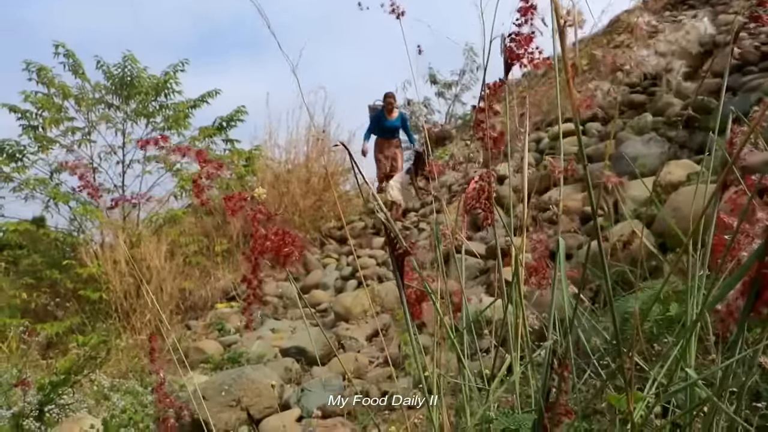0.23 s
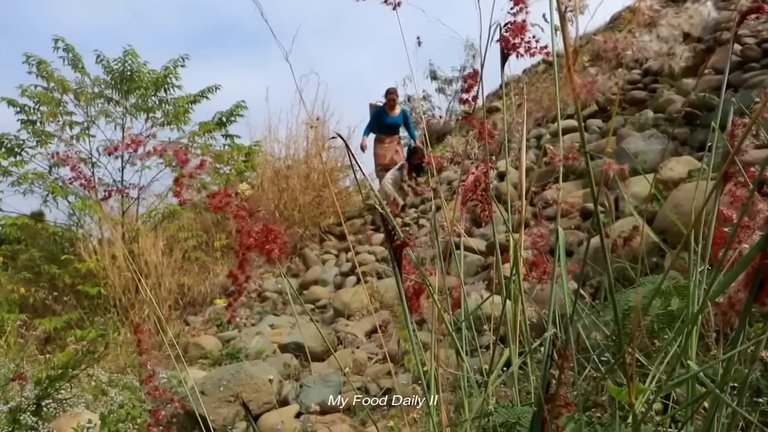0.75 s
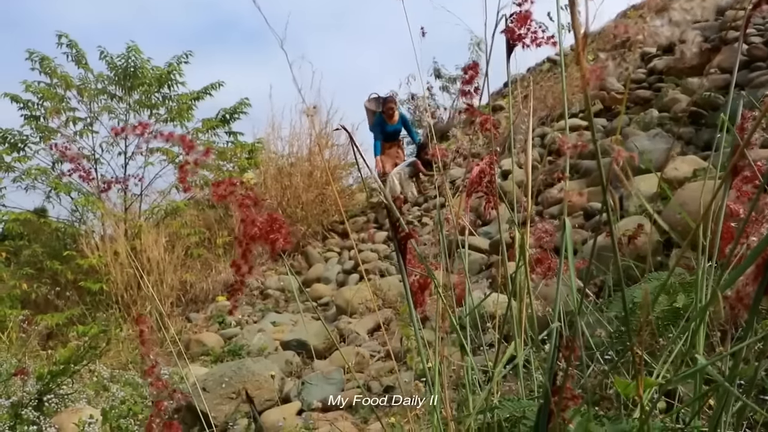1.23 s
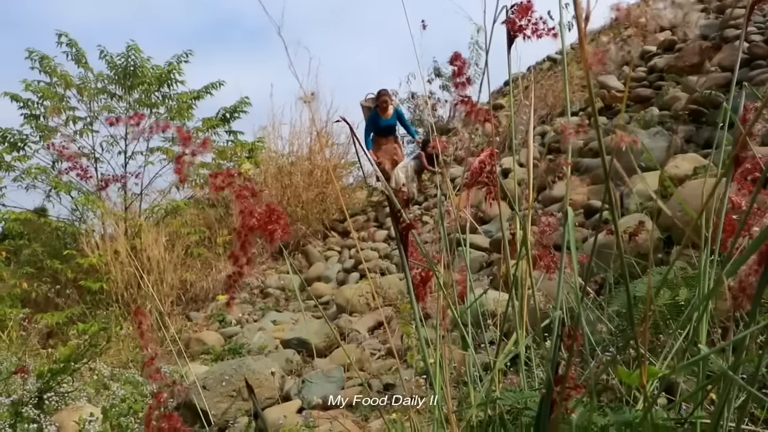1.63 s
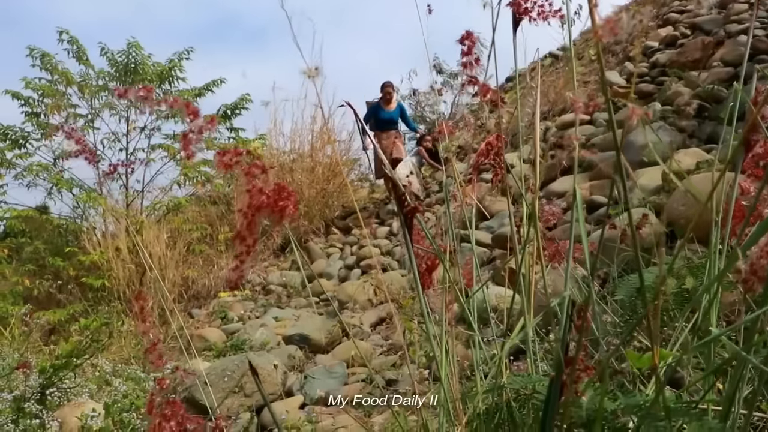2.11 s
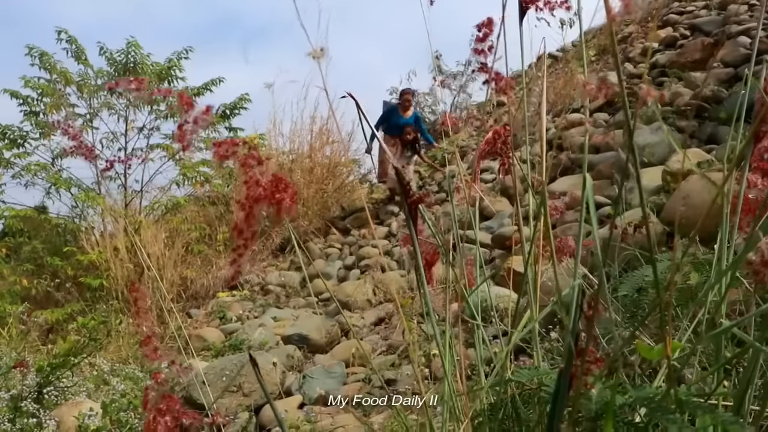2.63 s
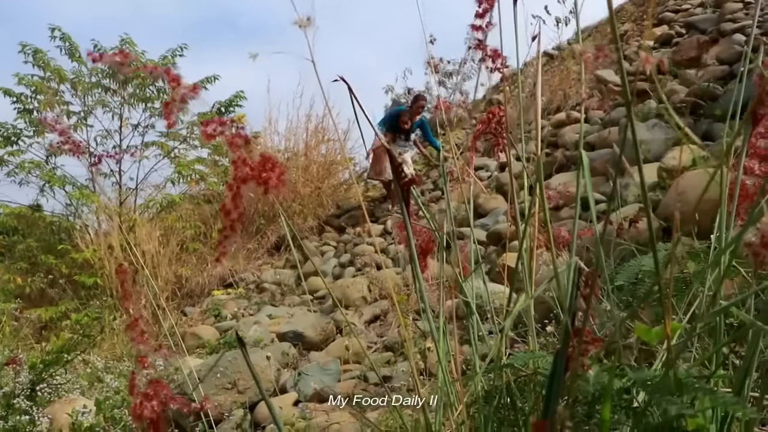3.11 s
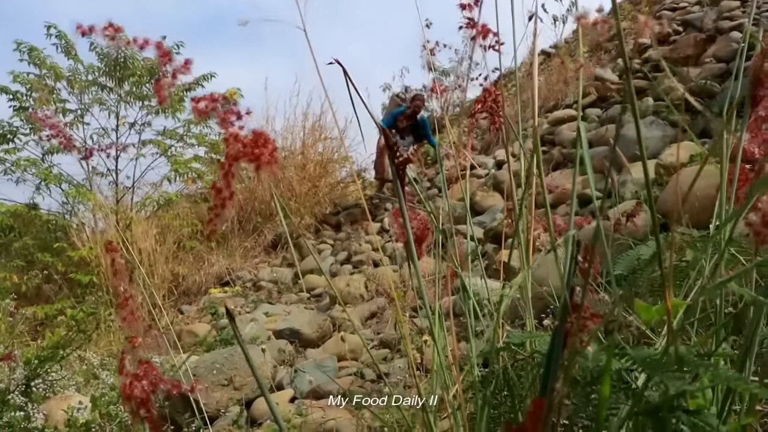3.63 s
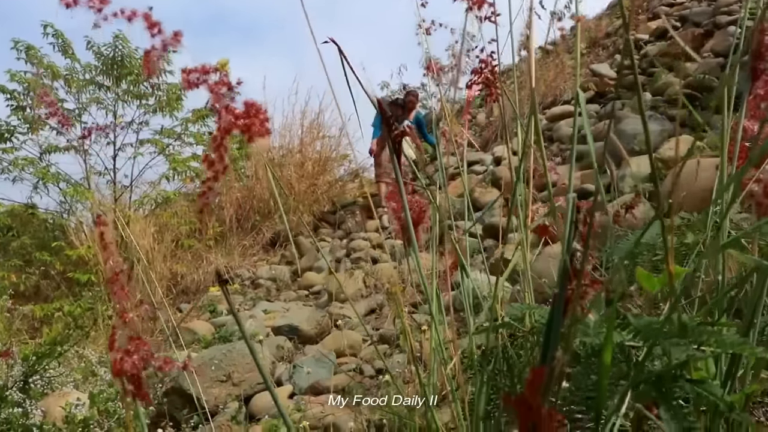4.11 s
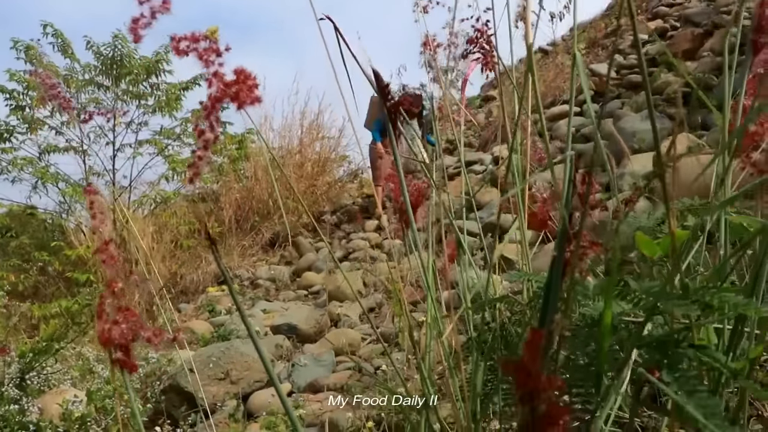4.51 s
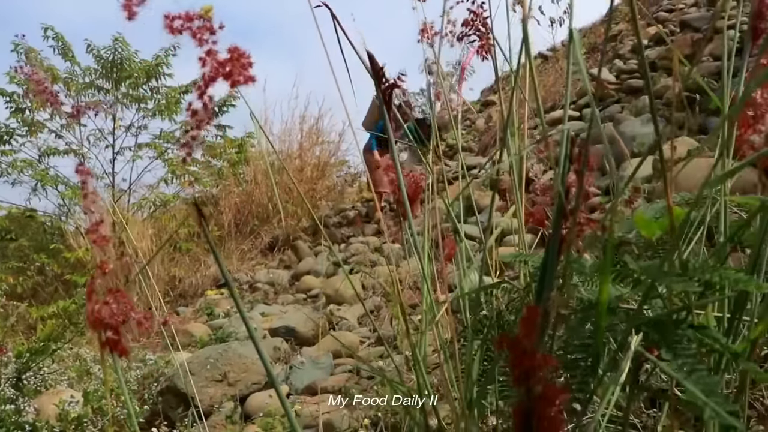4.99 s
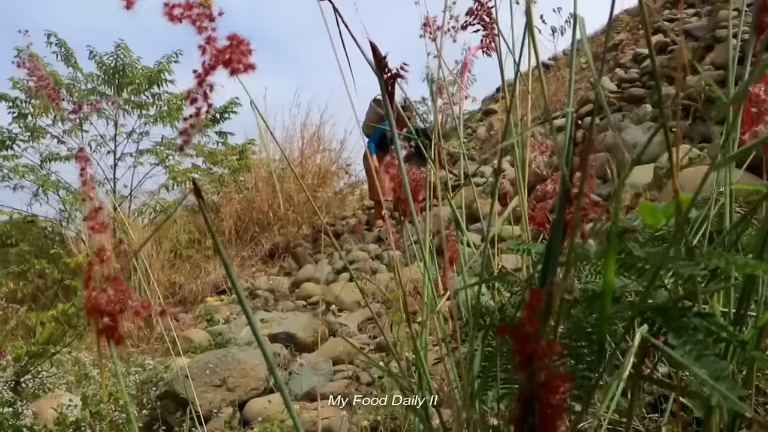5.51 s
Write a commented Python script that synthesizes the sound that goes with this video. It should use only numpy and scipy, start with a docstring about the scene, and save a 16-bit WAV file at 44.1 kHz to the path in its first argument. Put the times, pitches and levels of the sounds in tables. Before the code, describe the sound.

Someone steps down loose stones in the open air, over a soft hiss, a low breeze and a faint, distant engine hum. In the first second, soles scrape, dry grass rustles and several stones clack lightly. A high insect trill stops at about 0.7 seconds. The steps pause from 1 to 2 seconds while faint birds chirp, and the trill returns near 1.8 seconds and stays. A nearer bird gives short falling whistles at about 2.1, 3.3, 4.2 and 5.5 seconds. From 2.2 seconds, stems snap and pebbles grind, leading to the loudest knock near 2.9 seconds, sharp with a brief hollow ring, and another just after. From about 3.9 seconds more stones clatter and scrape. A strong double knock with dull thumps lands near 4.8 seconds, followed by a few thin squeaks and lighter clacks until about 5.6 seconds.

```python
"""Someone picks a way down loose river stones, while a far engine hums under the open air.
At first an insect trills with its wings, soles scrape, dry grass rustles and a few stones knock.
The steps pause and the insect rests; birds whistle on, and just before 2 seconds the trill returns.
Near 3 seconds comes the loudest knock: the stone rings, and so does the hollow beneath it.
From about 4 seconds more stones clatter, with thumping steps and a few thin squeaks."""
import sys
import numpy as np
from scipy import signal
from scipy.fft import rfft, irfft, next_fast_len
from scipy.io import wavfile
from scipy.ndimage import map_coordinates

SR = 44100
rng = np.random.default_rng(int(sys.argv[2]) if len(sys.argv) > 2 else 0)


def unload_audio(sound):
    """Save the sound as a 16-bit wav file, at the path given as the first command line argument."""
    columns = np.transpose(np.atleast_2d(sound))
    # keep every value between -1 and 1, then stretch to whole-number steps
    steps = np.round(np.clip(columns, -1, 1) * 32767)
    wavfile.write(sys.argv[1], SR, steps.astype(np.int16))


N = 253575  # 5.75 seconds

# Three noise colours. Each row: frequency in Hz, relative level in dB.
THUD_SPECTRUM = [(60, -36), (130, -1), (190, 3.5), (320, 6), (450, -10.5), (900, -70), (2000, -87)]  # the ground being thumped
GRIT_SPECTRUM = [(1500, -31), (3500, -3.5), (5500, -6.5), (8700, -2), (10500, -11.5), (15500, -13.5)]  # crushed grit and dry grass
SCRAPE_SPECTRUM = [(80, -64), (200, 7.5), (470, -2.5), (750, -3), (1400, 0), (2100, -9), (3500, -13),
                   (6000, -25)]  # a sole rubbing on stone


def amp(db):
    """Turn decibels into a number to multiply by."""
    return 10 ** (np.asarray(db) / 20)


def unit(x):
    """Scale a sound so its average strength (rms) is 1."""
    return x / np.sqrt(np.mean(x ** 2) + 1e-20)


def unit_hit(x):
    """Scale a hit so its first 30 ms have an average strength of 1."""
    return x / np.sqrt(np.mean(x[..., :round(.03 * SR)] ** 2))


def along(points, hz):
    """Read between rows of frequency and value, on a logarithmic frequency scale."""
    known_hz, values = np.transpose(points)
    return np.interp(np.log(hz + 1), np.log(known_hz + 1), values)


def curves(rows):
    """Turn rows that begin with a time into one smoothly joined curve per remaining column."""
    times, *columns = np.transpose(rows)
    return [np.interp(np.arange(N) / SR, times, column) for column in columns]


def wobble(rate, size=N):
    """A smooth curve through `rate` random values a second."""
    points = rng.standard_normal(int(size * rate / SR) + 4)
    return map_coordinates(points, [np.arange(size) * rate / SR])


def tone(hz):
    """A pure tone of strength 1 that follows a pitch curve."""
    return np.sqrt(2) * np.sin(2 * np.pi * np.cumsum(hz) / SR)


def swell(length):
    """Fade in, hold and fade out over `length` seconds."""
    return signal.windows.tukey(max(round(length * SR), 3), .5)


def add(track, start, sound):
    """Mix a sound into a track, `start` seconds in."""
    part = track[..., max(round(start * SR), 0):][..., :sound.shape[-1]]
    part += sound[..., :part.shape[-1]]


def filtered(x, response):
    """Turn each frequency up or down by the gain that `response` gives it."""
    size = x.shape[-1]
    padded = next_fast_len(size + 4096)
    gain = response(np.fft.rfftfreq(padded, 1 / SR))
    return irfft(rfft(x, padded) * gain, padded)[..., :size]


def noise(spectrum, size=N, grain_db=0):
    """Coloured stereo noise, wider in the treble; grain_db clumps it into tiny grains."""
    # Stereo width. Each row: frequency in Hz, level of the side signal against the middle in dB.
    width = [(60, -48), (250, -23.5), (1000, -20), (2000, -22.5), (4000, -12), (8000, -15), (13000, -4)]
    pair = rng.standard_normal((2, size)) * amp(grain_db * wobble(450, size))
    mid, side = filtered(
        pair, lambda hz: amp([along(spectrum, hz), along(spectrum, hz) + along(width, hz)]))
    return unit(np.array([mid + side, mid - side]))


def stem_spectrum(hz):
    """The noise colour of a rubbed or broken stem, strongest at hz."""
    return [(hz / 4, -35), (hz * 0.62, -8), (hz, 0), (hz * 1.12, -8), (hz * 2, -17), (hz * 4, -45)]


def slope_echoes(x, t60, wet_db):
    """A sound plus its echoes off the rocky slope; t60 is the seconds they take to fade by 60 dB."""
    t = np.arange(SR // 4) / SR
    tail = rng.standard_normal(len(t)) * amp(-60 * t / t60) * (1 - np.exp(-t / 0.0056))
    return x + amp(wet_db) * signal.fftconvolve(x, tail / np.linalg.norm(tail))[:len(x)]


def burst(spectrum, t, attack, t60, tail_db, tail_t60):
    """A puff of noise that drops quickly and leaves a weak, longer tail."""
    fall = amp(-60 * t / t60) + amp(tail_db - 60 * t / tail_t60)
    return unit_hit(noise(spectrum, len(t)) * fall * (1 - np.exp(-t / attack)))


def open_air():
    """A low breeze murmurs under a steady hiss of air."""
    # The colours of the hiss and the breeze. Each row: frequency in Hz, relative level in dB.
    hiss_spectrum = [(150, -28), (250, 0.5), (414, 0), (519, -0.5), (1420, -3), (2050, -5.5), (3650, -9.5),
                     (4340, -14), (6140, -9), (6820, -11), (8850, -16.5), (16000, -18.5)]
    breeze_spectrum = [(12, -0.5), (22, 3), (33, -1), (52, -1), (68, 0.5), (115, -6), (175, -2.5),
                       (240, -12.5), (500, -19.5), (1200, -67)]
    breeze = amp(-51.5 + 0.56 * wobble(5.8)) * noise(breeze_spectrum)
    return breeze + amp(-54) * noise(hiss_spectrum)


def far_engine():
    """An engine hums at its unsteady firing rate, with a weaker tone an octave up."""
    # How the engine runs. Each row: time in seconds, firing rate in Hz, relative level in dB.
    running = [(0.0, 82.3, -55), (0.54, 86.1, -54), (1.47, 86.8, -57), (1.79, 77.8, -52.5),
               (2.34, 84.1, -54), (2.56, 69.8, -49.5), (2.74, 70.8, -50.5), (3.01, 79.9, -50.5),
               (4.79, 82.3, -50), (5.75, 78.8, -50)]
    hz, db = curves(running)
    level = amp(db - 0.5 + 0.47 * wobble(8))
    octave = amp(-14.0 + 1.7 * wobble(20)) * tone(2 * hz + 6 * wobble(15))
    return level * (tone(hz) + octave)


def far_birds():
    """Distant birds whistle notes that bend through a first, a middle and a last pitch."""
    # Calls that dip and rise again. Each row: start in seconds, lowest pitch in Hz, relative level in dB.
    dips = [(.27, 6030, -54.5), (1.653, 5630, -52), (3.555, 5200, -56), (5.29, 5400, -56)]
    # Sliding notes. Each row: start and length in seconds, first and last pitch in Hz, relative dB.
    slurs = [(0.178, 0.18, 1750, 2664, -56.5), (.51, 0.13, 6950, 7900, -55),
             (0.906, 0.089, 4470, 5670, -54), (1.334, .19, 3670, 3660, -64), (1.55, 0.064, 3200, 3460, -58),
             (1.659, 0.063, 3190, 3560, -58), (3.14, 0.11, 4430, 5860, -57.5),
             (3.276, 0.11, 3390, 3580, -58), (3.708, 0.085, 4100, 3400, -59), (5.41, 0.08, 4390, 4374, -52)]
    dip_seconds, dip_top_hz = .185, 6640
    bend = .62  # share of a slide done at half time
    notes = [(start, dip_seconds, dip_top_hz, low_hz, dip_top_hz, db) for start, low_hz, db in dips]
    for start, length, first, last, db in slurs:
        notes.append((start, length, first, first + bend * (last - first), last, db))
    out = np.zeros(N)
    for start, length, *pitches, db in notes:
        progress = np.linspace(0, 1, max(round(length * SR), 2))
        glide = np.polyval(np.polyfit([0, .5, 1], pitches, 2), progress)
        hz = glide * (1 + 0.0174 * wobble(252.5, len(progress)))
        fade = np.abs(np.sin(np.pi * progress)) ** 0.05
        add(out, start, amp(db + wobble(58, len(progress))) * fade * tone(hz))
    return amp(-4.0) * slope_echoes(out, t60=0.12, wet_db=-1.5)


def near_bird():
    """The nearest bird repeats a fluttering whistle that jumps up and then falls."""
    # When it calls. Each row: start in seconds, relative level in dB.
    calls = [(0.746, -49), (2.136, -38.5), (3.348, -38.5), (4.158, -39.5), (5.518, -41.5)]
    # One whistle. Each row: seconds into the call, pitch in Hz, relative level in dB.
    whistle = [(0, 3670, -16), (0.017, 4250, -7), (0.025, 4523, -4.5), (0.061, 4386, -4.5),
               (0.098, 4356, -6), (.135, 4060, -11.5), (.155, 3770, -28)]
    times, hz, shape_db = np.transpose(whistle)
    out, t = np.zeros(N), np.arange(round(times[-1] * SR)) / SR
    for start, db in calls:
        pitch = np.interp(t, times, hz) * (1 + .011 * wobble(200, len(t)))
        flutter_db = 2.3 * wobble(110, len(t))
        add(out, start, amp(db - 3.0 + np.interp(t, times, shape_db) + flutter_db) * tone(pitch))
    return slope_echoes(out, t60=.12, wet_db=-8)


def insect(strokes_per_second=42.0, ripples_per_stroke=3.5, ripple_depth=0.61):
    """Every wing stroke is a short, ribbed chirp whose pitch sags as the stroke slows."""
    # Two spells of song. Each row: start and end in seconds, pitch in Hz, relative level in dB.
    trills = [(-0.94, 0.658, 6770, -51.5), (1.84, 6, 6840, -51)]
    warm_up_seconds, warm_up_db, tiring_db_per_second = 0.46, 9.5, 1.14
    out, t = np.zeros(N), np.arange(N) / SR
    for start, end, pitch_hz, level_db in trills:
        age = np.maximum(t - start, 0)
        hz = pitch_hz - 205 * np.exp(-age / 0.58)  # starts low and climbs to its pitch
        db = level_db - warm_up_db * np.maximum(1 - age / warm_up_seconds, 0) - tiring_db_per_second * age
        cycle = np.cumsum(strokes_per_second * (1 + .015 * wobble(15))) / SR % 1
        stroke = np.minimum(cycle / .8, 1)  # the last fifth of each cycle is silent
        force = np.abs(np.sin(np.pi * stroke)) ** .7 * amp(-6.5 * stroke + 1.4 * wobble(200))
        ribs = 1 + ripple_depth * stroke * np.cos(2 * np.pi * ripples_per_stroke * stroke)
        sag_hz = 170 * np.tanh(9 * (.47 - stroke)) - 10 + 55 * wobble(500)
        song = unit(force * ribs * tone(hz + sag_hz))
        out += song * amp(db - 1.73 + 1.2 * wobble(30)) * (t >= start) * (t <= end)
    return slope_echoes(out, t60=.05, wet_db=-10)


def squeaks(sag_share=.06, sag_seconds=0.15, fade_db_per_second=31):
    """Thin, high squeaks sink in pitch as they fade."""
    # Each row is a squeak: start and length in seconds, first pitch in Hz, level in dB.
    notes = [(0.494, 0.45, 15500, -50.5), (.49, 0.04, 9470, -52), (4.84, 0.029, 8950, -44),
             (5.055, 0.013, 8980, -46), (5.409, 0.13, 15600, -54)]
    out = np.zeros(N)
    for start, length, hz, db in notes:
        t = np.arange(round(length * SR)) / SR
        sag = sag_share * (1 - np.exp(-t / sag_seconds))
        pitch = hz * (1 - sag + .002 * wobble(250, len(t)))
        level = amp(db - fade_db_per_second * t + 1.8 * wobble(54, len(t)))
        soft_ends = np.abs(np.sin(np.pi * t / length)) ** 0.15
        add(out, start, level * soft_ends * tone(pitch))
    return out


def booms(hz=175):
    """A low, hollow, wavering note swells briefly under some steps."""
    # Each row is a boom: start and length in seconds, level in dB.
    notes = [(.42, 0.118, -53), (2.58, 0.25, -46.5)]
    out = np.zeros(N)
    for start, length, db in notes:
        shape = swell(length)
        level = amp(db + 3.1 * wobble(43, len(shape))) * shape
        add(out, start, level * tone(hz * (1 + 0.05 * wobble(40, len(shape)))))
    return out


def blade_ticks(per_second=55):
    """Single blades of dry grass give bright ticks at random moments."""
    ticks = (rng.random(N) < per_second / SR) * amp(np.minimum(6 * rng.standard_normal(N), 7))
    fall = amp(-60 * np.arange(SR // 100) / SR / .004)
    return unit(signal.fftconvolve(ticks, fall)[:N] * noise(GRIT_SPECTRUM))


def pebbles(per_second=300, spread_db=7.5):
    """Small stones tick against each other at random, each at its own pitch."""
    out, t = np.zeros(N), np.arange(SR // 50) / SR
    for life, pitch, size in rng.standard_normal((int(per_second * N / SR), 3)):
        hz = 1080 * np.exp(.33 * pitch)
        t60 = 0.011 * np.exp(0.071 * life)
        tick = np.sin(2 * np.pi * hz * t) * amp(-60 * t / t60)
        add(out, rng.uniform(0, N / SR), amp(spread_db * min(size, 2)) * tick)
    return unit(out)


def slides():
    """Soles grind over stone and roll pebbles, while legs part the dry grass."""
    # Each row is a slide: start and length in seconds, relative grinding and rustling levels in dB.
    moves = [(0, 0.16, -57.5, -58.5), (0.729, 0.267, -55.5, -57.5), (1.932, 0.21, -58.5, -56.5),
             (2.105, 0.62, -61.5, -55), (2.571, 0.2, -50, -57.5), (2.72, 0.39, -51, -51),
             (3.426, 0.077, -52.5, -63), (3.966, 0.32, -49, -72), (4.3, 0.18, -47, -60),
             (4.439, 0.15, -53, -72), (4.637, 0.27, -53.5, -58.5), (5.017, 0.098, -57.5, -61),
             (5.326, 0.056, -48.5, -65), (5.51, 0.089, -56, -73)]
    pressure, rustle = np.zeros(N), np.zeros(N)
    for start, length, grind_db, rustle_db in moves:
        add(pressure, start, amp(grind_db) * swell(length))
        add(rustle, start, amp(rustle_db) * swell(length))
    grinding = amp(0.5) * noise(SCRAPE_SPECTRUM, grain_db=1.0) + amp(-1.0) * pebbles()
    grinding *= amp(3.4 * wobble(60))
    rumble = amp(-4) * noise(THUD_SPECTRUM)  # the bed of stones shifts
    stirring = amp(-62.5 + 2.7 * wobble(3.93))  # the grass also moves by itself
    grass = amp(-1.5) * noise(GRIT_SPECTRUM, grain_db=1.5) + amp(-5) * blade_ticks()
    return pressure * (grinding + rumble) + np.hypot(rustle, stirring) * grass


def swishes():
    """Stems and a skirt brush past with a short hiss."""
    # Each row is a brush: start and length in seconds, centre frequency in Hz, relative level in dB.
    brushes = [(0.105, 0.18, 8700, -59.5), (0.679, 0.15, 8900, -57), (0.947, 0.1, 2740, -54),
               (1.598, 0.22, 8850, -57), (3.331, 0.029, 8600, -52), (3.854, 0.057, 8700, -57),
               (5.06, 0.041, 8800, -60)]
    out = np.zeros((2, N))
    for start, length, hz, db in brushes:
        shape = swell(length)
        add(out, start, amp(db + 2.5) * shape * noise(stem_spectrum(hz), len(shape)))
    return out


def thud(t):
    """A dull thump in the ground."""
    return burst(THUD_SPECTRUM, t, attack=.001, t60=.07, tail_db=-22, tail_t60=.2)


def grit(t):
    """A short crackle of crushed grit."""
    return burst(GRIT_SPECTRUM, t, attack=.0003, t60=.016, tail_db=-15, tail_t60=.09)


def footsteps():
    """A foot thumps the ground as it takes the weight; stems and grit snap beneath it."""
    # The weight landing. Each row: start in seconds, relative level in dB.
    footfalls = [(0.491, -52), (0.91, -40.5), (0.953, -42), (2.592, -46.5), (2.869, -39.5), (4.089, -49),
                 (4.798, -32.5), (4.842, -34), (5.058, -40.5)]
    # Things snapping underfoot. Each row: start in seconds, centre frequency in Hz, relative level in dB.
    snaps = [(0.491, 4400, -48), (0.956, 4400, -48), (2.246, 4900, -39.5), (2.249, 11000, -47),
             (2.4335, 4100, -37), (2.585, 12000, -42), (2.592, 3650, -38), (2.615, 12000, -48),
             (2.887, 5500, -48), (2.994, 8350, -33.5), (3.0025, 3600, -30), (3.279, 7490, -46.5),
             (4.843, 5230, -42.5)]
    out, t = np.zeros((2, N)), np.arange(SR // 5) / SR
    for start, db in footfalls:
        add(out, start, amp(db - 3.0) * thud(t))
    for start, hz, db in snaps:
        snap = burst(stem_spectrum(hz), t, attack=0.00045, t60=0.03, tail_db=-19, tail_t60=.12)
        add(out, start, amp(db - 5.5) * (snap + amp(-7) * grit(t)))
    return out


def clack(t, tones, pitch, rebound_s, rebound_db, wet_db):
    """A brief ring that sounds again as the stone rocks back; pitch multiplies every frequency."""
    ring = sum(amp(db + rng.normal(0, 1) - 60 * t / t60) * np.sin(2 * np.pi * pitch * frequency * t)
               for frequency, db, t60 in tones)
    ring *= 1 - np.exp(-t / .0004)
    both = ring.copy()
    add(both, rebound_s, amp(rebound_db) * ring)
    return unit_hit(slope_echoes(both, t60=0.091, wet_db=wet_db))


def knocks():
    """One stone hits another: it rings with the hollow below, thumps the ground and crushes grit."""
    # Each row is a knock: start in seconds, relative level in dB, ring pitch in Hz,
    # then how many dB to raise or lower the hollow and the edge.
    hits = [(0.0934, -31, 1440, -20, -18.5), (0.4906, -33.5, 1940, -12.5, -10.5),
            (0.6705, -24.5, 1345, -31, -22), (0.6864, -34, 1450, -8.5, -26), (0.696, -31, 1270, -24, -22),
            (0.824, -39.5, 1280, 0.5, -4), (0.891, -35.5, 2010, -15, -6.5), (0.9086, -31, 1064, -30, -8.5),
            (2.2996, -50.5, 1070, 4, -7), (2.3596, -44.5, 1170, -1.5, -9.5),
            (2.4338, -30.5, 1750, -16, -3.5), (2.592, -42.5, 1730, 1, 10.5),
            (2.6103, -38.5, 1110, 6.5, -24), (2.7667, -42, 1020, -2.5, -13), (2.8275, -25, 1113, -12, -20),
            (2.869, -7.5, 1380, -14.5, -26), (3.0022, -14.5, 1434, -13.5, -4.5),
            (3.0258, -22.5, 1280, -28, -21), (3.8723, -34.5, 1194, -7, -20), (3.9619, -31.5, 1132, -4, -35),
            (4.0868, -26.5, 1440, -6, -20), (4.2946, -36.5, 1170, -2, -8.5), (4.3288, -24, 1114, -4.5, -26),
            (4.3428, -35, 1580, -2, -18), (4.799, -18, 1480, -9, -12.5), (4.8421, -22.5, 1343, -6, -11.5),
            (4.8852, -34, 1390, -11, -12), (4.8927, -36, 1150, -8, -21), (4.9644, -35.5, 1060, -9, -30),
            (4.9879, -39.5, 1090, -4, -28), (5.0567, -31, 1017, -4, -12), (5.0678, -31.5, 1470, -13, -7.5),
            (5.2895, -34, 1120, -7, -25), (5.3546, -39.5, 1790, -5, -10.5), (5.4093, -37.5, 1927, -8, -8)]
    # A stone's tones. Each row: multiple of the ring pitch, relative dB, seconds to fade by 60 dB.
    stone_tones = [(.76, -24, 0.0075), (0.921, -3.5, 0.028), (1.004, 6.5, 0.017), (1.24, 0.5, 0.014),
                   (1.62, -16.5, 0.048)]
    # The tones of a gap between rocks and of a stone's hard edge.
    # Each row: typical frequency in Hz, relative level in dB, seconds to fade by 60 dB.
    hollow_tones = [(677, -24, 0.012), (793, 0, 0.045), (927, 7, 0.022)]
    edge_tones = [(1796, 0, 0.013), (2340, 4.5, 0.01), (2920, 6.5, 0.013), (3310, 0.5, 0.018),
                  (3770, -2.5, 0.0081)]
    hard_db = -8  # harder contacts ring the edge higher, softer ones lower
    out, t = np.zeros((2, N)), np.arange(SR // 5) / SR
    for start, db, hz, hollow_db, edge_db in hits:
        ring = amp(-12.5) * clack(t, stone_tones, hz, rebound_s=3 / hz, rebound_db=-7, wet_db=-12)
        hollow = clack(t, hollow_tones, rng.normal(1, 0.15), rebound_s=0.00287, rebound_db=-10, wet_db=-9)
        edge_pitch = rng.normal(1 + .07 * np.tanh((edge_db - hard_db) / 4), .015)
        crack = clack(t, edge_tones, edge_pitch, rng.uniform(.0015, .003), rebound_db=-5, wet_db=-10)
        below = amp(hollow_db) * (amp(-8.0) * hollow + amp(-21.5) * thud(t))
        edge = amp(edge_db) * (amp(-7.5) * crack + amp(-44.0) * grit(t))
        add(out, start + .0005, amp(db) * (ring + below + edge))
        # A faint, rough noise swells just before each knock.
        lead_in = amp(db - 26 - 60 * t[::-1] / .05) * noise(SCRAPE_SPECTRUM, len(t), grain_db=3)
        add(out, start - t[-1], lead_in)
    return out


def scene():
    """Mix the walker with the animals, the engine and the air, in stereo."""
    walker = knocks() + footsteps() + slides() + swishes() + booms()
    return walker + insect() + near_bird() + far_birds() + squeaks() + far_engine() + open_air()


def record(dry):
    """Cut away everything above 15900 Hz."""
    return filtered(dry, lambda hz: hz < 15900)


dry = scene()
out = record(dry)
unload_audio(out)
```